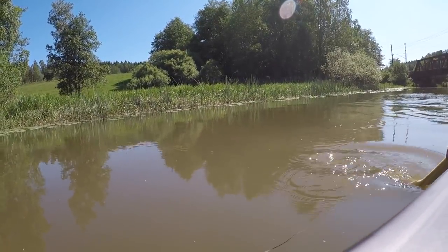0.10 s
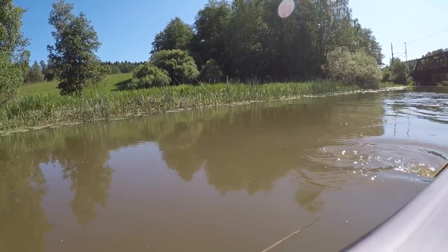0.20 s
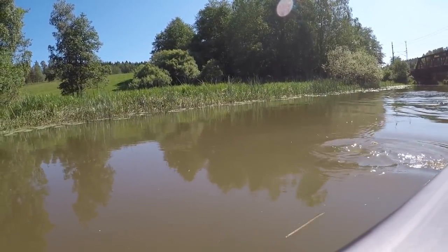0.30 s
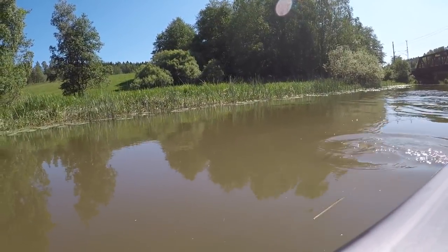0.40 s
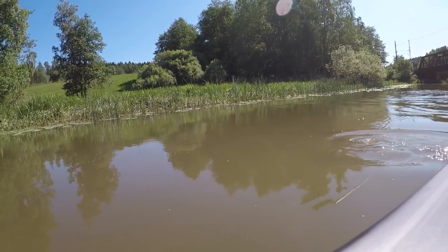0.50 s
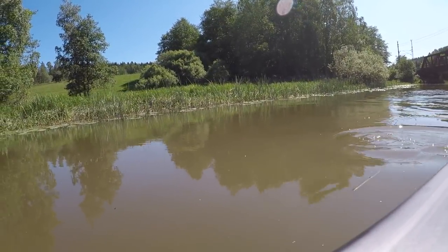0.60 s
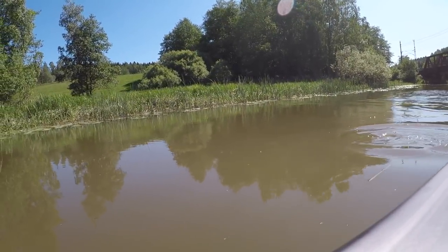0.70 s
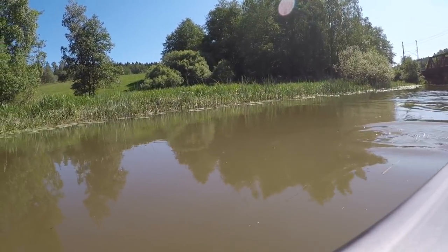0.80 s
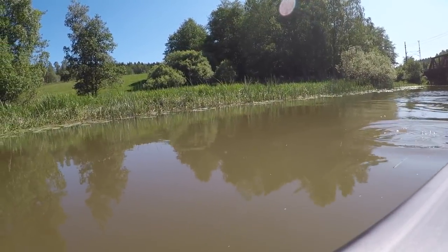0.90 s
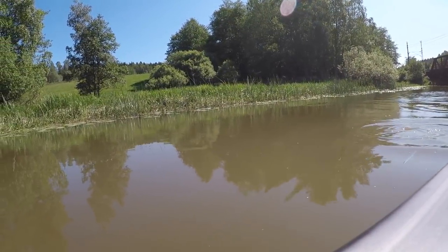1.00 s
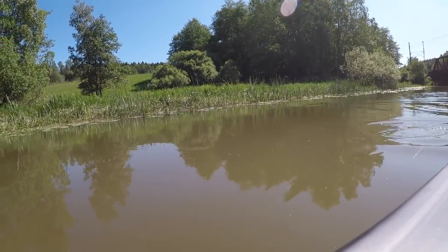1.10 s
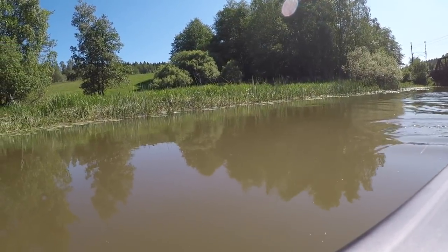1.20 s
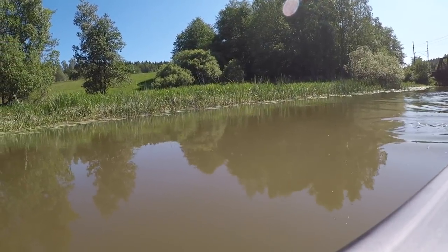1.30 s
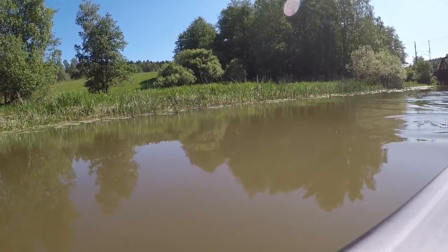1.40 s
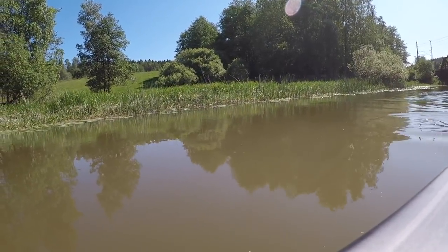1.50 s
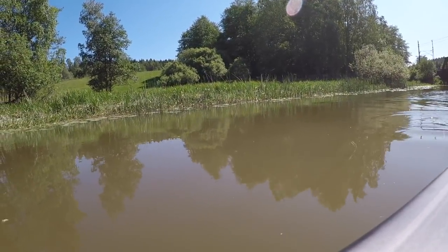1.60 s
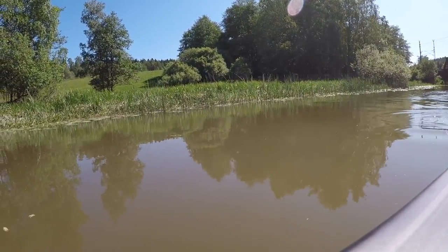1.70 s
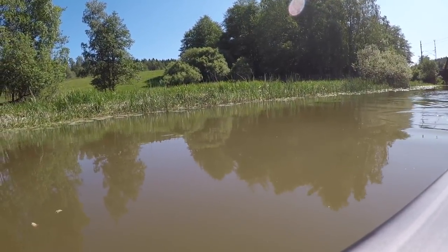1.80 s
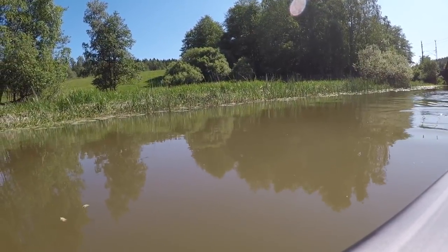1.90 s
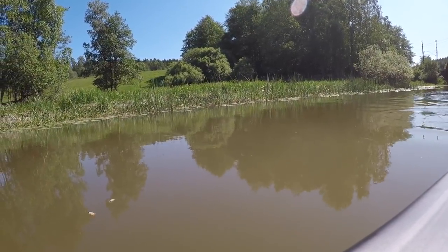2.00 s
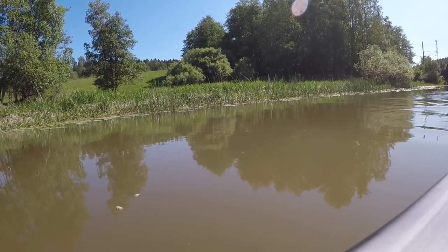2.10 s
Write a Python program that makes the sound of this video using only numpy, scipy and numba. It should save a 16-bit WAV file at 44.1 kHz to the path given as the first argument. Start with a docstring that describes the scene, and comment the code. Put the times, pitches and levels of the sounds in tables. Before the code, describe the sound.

Soft leaf and water hiss with faint hoarse chirps opens. At about 0.25 seconds a paddle shaft knocks very loudly on the canoe's edge, hollow and boomy with a dry crack, bouncing until 0.32. A low woody creak sags until 0.63, with rumbling rubbing and small knocks fading after 1.0. Birds whistle faintly, mostly 1.0-1.8, over faint distant hums; duller taps come near 1.64 and 1.8.

```python
"""A soft hiss of leaves and water comes first, with hoarse chirps on top; then a paddle shaft knocks hard
on a canoe's gunwale, bounces, creaks and rubs along it, and taps twice more while birds whistle.
Filtered noise makes the hiss, low rumble and wood cracks; sines make the birds, two distant hums and the creak.
Impulses and tiny clicks ring the hull modes, which two microphones on the boat feel differently.
The loud knock makes a gain control duck, hold and recover."""
import sys
import numpy as np
from scipy import signal
from scipy.fft import rfft, irfft
from scipy.io import wavfile
from scipy.ndimage import uniform_filter1d, minimum_filter1d
from numba import njit

SR = 44100
rng = np.random.default_rng(int(sys.argv[2]) if len(sys.argv) > 2 else 0)


def wav_record(signal):
    """Record a signal, one row per channel, as 16-bit PCM in the file named by sys.argv[1]."""
    frames = np.transpose(np.atleast_2d(signal))
    bounded = np.clip(frames, -1, 1)
    # unit amplitude maps onto the largest positive 16-bit level
    quanta = np.round(bounded * 32767).astype(np.int16)
    wavfile.write(sys.argv[1], SR, quanta)


N = 92610

# Hiss colour: f/Hz, relative level/dB
AIR_SPECTRUM = [(180, -65), (300, -43), (336, 3), (646, 7.5), (799, 3), (1070, 4), (1440, -3.5),
                (2160, -8.5), (7490, -13), (10000, -16), (14900, -30.5)]
# Stereo likeness of the hiss: f/Hz, left-right correlation (-1 to 1)
AIR_CORRELATION = [(500, -0.81), (1200, -0.63), (2500, 0.085), (4300, -0.072), (8000, 0.1)]
AIR_DB, AIR_FLICKER_DB = -58, 0.86

# Bird notes, one of them long, and two faint steady distant hums: t/s, length/s, start f/Hz, end f/Hz,
# level/dB, bend (exponent of the glide), left minus right/dB, hoarseness (0-1)
BIRDS_AND_HUMS = [(0, .075, 7100, 6800, -68, 1, -2, .8), (.072, .05, 5700, 5100, -63, .4, -2, .8),
                  (.45, .58, 4440, 4370, -68, .5, -4, .3), (.69, .05, 6200, 6200, -68, 1, 0, .2),
                  (.985, .05, 6150, 6100, -62, 1, -2, .2), (1.045, .09, 5900, 5300, -62, .4, -2, .1),
                  (1.18, .015, 2900, 3300, -66, 1, -2, .2), (1.222, .02, 3300, 3600, -65, 1, 0, .4),
                  (1.23, .55, 968, 966, -63.5, 1, 12, .3), (1.3, .5, 2255, 2250, -73, 1, 0, .2),
                  (1.298, .055, 6110, 6104, -54, 1, -2, .05), (1.34, .07, 6108, 6104, -65, 1, -2, .1),
                  (1.408, .025, 5700, 6150, -60, .3, -2, .1), (1.432, .033, 5900, 4700, -58, 1, -2, .25),
                  (1.455, .05, 7700, 7100, -72, 1, 2, .8), (1.465, .03, 5300, 5050, -67, .6, -2, .2),
                  (1.49, .015, 3000, 3400, -59, 1, 0, .1), (1.505, .015, 2800, 2400, -57, 1, 0, .3),
                  (1.568, .02, 4900, 5350, -59, .5, -2, .1), (1.585, .035, 5350, 5100, -61, 2, -2, .2),
                  (1.622, .02, 3600, 2900, -53, .6, 0, .1), (1.685, .03, 7200, 7100, -70, 1, 2, .7),
                  (1.765, .055, 3900, 3150, -63, 1, 0, .6)]
NOTE_FADE_S, ECHO_T60_S, ECHO_DB = .006, .12, -7

# Ringing of hull and mount: f/Hz, relative level/dB, t60/s
HULL_MODES = [(30, -3, .12), (50, -5, .07), (92, 0, .12), (150, 0, .13), (224, 0, .075), (262, 0, .13),
              (322, -12, .08), (400, -5, .08), (455, -1, .08), (535, -3, .055), (590, 1, .035),
              (700, 0, .05), (775, 0, .05), (860, -6, .04), (965, -3, .035), (1070, 0, .03),
              (1170, -5, .03), (1290, -6, .025), (1400, -9, .025), (1520, -2, .03), (1740, -7, .025)]
# Edges of the mode groups: f/Hz (rumble, thud, low and high boom, low and high clack, tick)
MODE_GROUP_EDGES = (0, 120, 190, 240, 360, 640, 880, 9000)
# Delay of each group after a knock: t/s (the slow bending waves come late)
GROUP_ARRIVALS = (.012, .008, .006, .004, 0, 0, .001)
# Time each group takes to swell: t/s
GROUP_SWELLS = (.012, .01, .011, .008, .004, .003, .0025)
# Knocks of the shaft: t/s, then level/dB of rumble, thud, low boom, high boom, low clack, high clack, tick
SHAFT_KNOCKS = [(0.231, -18, -42.5, -24, -63, -40, -23, -49), (0.24, -38, -13, -9, -58, -19.5, -17.5, -42),
                (.2485, -22, -8, 7, -3, 2.5, -6, -25), (0.281, -27, -14.5, 1, -33, -14, -17.5, -36),
                (0.295, -28, -31.5, -32, -22, -21, -26, -42.5),
                (0.3209, -16, -18, 5.5, -32.5, -13.5, -20, -34), (.657, -43, -45, -30, -44, -18, -51, -56),
                (0.673, -56, -30.5, -16.5, -17.5, -25, -46, -40.5),
                (0.739, -53, -52, -16, -19.5, -15.5, -24, -60), (0.77, -55, -31, -46, -25.5, -18, -23, -42),
                (.864, -25, -32, -20.5, -30, -24.5, -21.5, -32),
                (0.922, -36, -26.5, -46.5, -21.5, -16.5, -24, -40.5),
                (1.005, -35.5, -65, -26, -48, -54, -44, -40.5),
                (1.276, -41.5, -33.5, -37, -28.5, -29.5, -43.5, -44),
                (1.3, -32.5, -44.5, -32, -37, -32, -50, -82.5),
                (1.431, -36, -38, -33.5, -49, -24, -33, -49), (1.641, -29.5, -33, -25, -14, -8.5, -23, -39),
                (1.695, -37, -35, -23, -46, -28, -28, -44),
                (1.8, -34, -23.5, -25.5, -20.5, -14, -18.5, -36.5),
                (1.926, -46, -48.5, -41.5, -61, -56, -54, -62)]
# Rubbing and lapping on the hull: t/s, then level/dB of the same seven groups
HULL_RUB = [(0.0, -77, -50, -53, -56, -56.5, -72, -65), (0.18, -66, -53.5, -60, -64.5, -67, -89, -107),
            (0.25, -67, -24.5, -38, -64, -49, -69, -46.5), (0.318, -66, -30, -43, -41, -37.5, -59, -62),
            (0.327, -56, -25, -32.5, -38.5, -29, -41, -40.5),
            (0.41, -33.5, -37.5, -22, -49, -42, -60.5, -47),
            (0.46, -30, -37.5, -31.5, -38, -36.5, -51, -51), (0.59, -33, -32.5, -32, -34, -27, -58.5, -57),
            (0.7, -45, -35, -61.5, -33.5, -40, -59, -57.5),
            (0.87, -32.5, -45.5, -77.5, -43.5, -49, -60, -65.5),
            (0.97, -38, -45.5, -36, -39, -50.5, -64, -69), (1.08, -40.5, -46.5, -44.5, -52, -60, -74, -76),
            (1.23, -42, -46.5, -62, -45, -56, -83, -71), (1.39, -50, -54, -50.5, -43.5, -61, -83, -80),
            (1.51, -46, -56, -57, -54, -67, -86, -83), (1.65, -53, -65, -79, -56, -67, -89, -75),
            (1.78, -48.5, -69.5, -47, -51.5, -61.5, -67, -73),
            (1.86, -50.5, -35.5, -47, -50.5, -64, -69, -73),
            (1.99, -59, -77, -61.5, -55.5, -65, -97, -72.5), (2.1, -65, -50, -56, -52.5, -64, -77, -66)]
RUB_CLICKS_PER_S, RUB_TOP_HZ = 1500, 1950
RUB_SCATTER_DB, RUB_PATCHY_DB = 1.8, 1.6
LOOSE_RUMBLE_DB = -7  # relative to the rumble of the rubbing
# How the right microphone feels the hull against the left: f/Hz, level/dB, phase/rad
RIGHT_MICROPHONE = [(40, 0, .2), (90, -4, -.3), (150, -3, -.7), (195, -11, 1.5), (220, -9, 2.6),
                    (260, 1, 2.0), (320, -7, 1.0), (390, -12, 2.9), (520, -5, 3.1), (700, -1, 3.1),
                    (1000, -2, 3.7), (1250, 0, 3.6), (1600, -1, 4.6), (2500, -1, 5.5)]

# Dry cracks of wood: t/s, level/dB
WOOD_CRACKS = [(0.2544, -20.5), (0.864, -50), (0.926, -44.5)]
CRACK_BAND_HZ, CRACK_T60_S = (900, 3170), 0.0079

# Creak of the shaft: t/s, pitch f/Hz, level/dB
SHAFT_CREAK = [(0.323, 544, -7.5), (.36, 536.6, -8), (.42, 552.6, -12.5), (0.478, 534.5, -13.5),
               (0.497, 514, -11.5), (0.537, 513, -16), (0.554, 455.4, -14.5), (.572, 462, -6),
               (.59, 441, -36), (0.626, 474, -22.5)]
# Overtones of the creak: multiple of the pitch, level/dB against the fundamental
CREAK_HARMONICS = [(2, -30), (3, -44)]
CREAK_WAVER, CREAK_FLICKER_DB = .01, 3.5  # waver as a fraction of the pitch

DUCK_ABOVE_DB, FAST_SHARE, SLOW_SHARE = -11.5, 1, 0.73  # shares: dB of ducking per dB over
FAST_ATTACK_S, FAST_RELEASE_S = .01, .036
SLOW_ATTACK_S, SLOW_RELEASE_S, HOLD_S = .035, .11, 0.48
CEILING, TOP_HZ = 1.25, 14400


def amp(db):
    """Turn decibels into a linear factor."""
    return 10 ** (np.asarray(db) / 20)


def unit(x):
    """Scale a sound to an RMS of 1."""
    return x / np.sqrt(np.mean(x ** 2))


def walk(rate):
    """Random levels held 1 / rate s and slewed twice into a smooth drift."""
    k = int(SR / rate)
    held = np.repeat(rng.standard_normal(N // k + 1), k)
    slewed = uniform_filter1d(uniform_filter1d(held, k), k)
    return 1.3 * slewed[:N]  # makes up for swing lost in the slewing


def column(table, index):
    """Draw straight lines through one column of a table over time."""
    table = np.array(table)
    return np.interp(np.arange(N) / SR, table[:, 0], table[:, index])


def air():
    """Smooth hiss of leaves and water: coloured noise whose octaves each flicker a little on their own."""
    hz = np.maximum(np.fft.rfftfreq(N, 1 / SR), 1)

    def over_pitch(table):
        points = np.array(table)
        return np.interp(np.log(hz), np.log(points[:, 0]), points[:, 1])

    alike = np.clip(over_pitch(AIR_CORRELATION), -1, 1)
    noise = rfft(rng.standard_normal((2, N))) * amp(over_pitch(AIR_SPECTRUM))
    mid, side = noise * np.sqrt([1 + alike, 1 - alike])
    stereo = np.array([mid + side, mid - side])
    scale = np.sqrt(np.mean(irfft(mid * (hz > 1000), N) ** 2))  # mid level above 1 kHz
    out = 0
    for octave in range(8, 15):  # centred on 2 ** octave Hz, crossfading into its neighbours
        band = np.clip(1 - np.abs(np.log2(hz) - octave), 0, 1)
        out = out + irfft(stereo * band, N) * amp(AIR_FLICKER_DB * walk(11.0))
    return out / scale * amp(AIR_DB)


def loose_rumble():
    """Low rumble, independent noise in each channel, rising and falling with the rub's rumble."""
    band = signal.butter(2, (25, 170), "bandpass", fs=SR, output="sos")
    noise = signal.sosfilt(band, rng.standard_normal((2, N)))
    return unit(noise) * amp(column(HULL_RUB, index=1) + LOOSE_RUMBLE_DB)


def birds_and_hums():
    """Sines that glide as bird notes or stay nearly steady as hums, hoarse ones roughened by fast
    level swings, all with a faint echo from the bank."""
    out = np.zeros((2, N))
    rough, waver = walk(900), amp(2.5 * walk(25))
    for start, length, hz0, hz1, db, bend, pan_db, hoarse in BIRDS_AND_HUMS:
        i = int(max(start, 0) * SR)
        u = np.linspace(0, 1, int(length * SR))
        span = slice(i, i + len(u))
        pitch = hz0 + (hz1 - hz0) * u ** bend
        fade = np.clip(np.minimum(u, 1 - u) * length / NOTE_FADE_S, 0, 1)
        tone = np.sin(2 * np.pi * np.cumsum(pitch) / SR) * fade
        tone = tone * waver[span] * (1 - hoarse + 1.5 * hoarse * rough[span])
        sides_db = db + np.array([[pan_db], [-pan_db]]) / 2
        out[:, span] += tone * amp(sides_db) * np.sqrt(2)
    t = np.arange(SR // 4) / SR
    echo = rng.standard_normal((2, len(t))) * amp(-60 * t / ECHO_T60_S)
    echo = echo / np.sqrt(np.sum(echo[0] ** 2)) * amp(ECHO_DB)
    return out + signal.fftconvolve(out, echo, axes=1)[:, :N]


def both_microphones(x):
    """The hull shakes the two microphones with different strength and phase at each frequency."""
    hz = np.fft.rfftfreq(N, 1 / SR)
    port_hz, port_db, port_phase = np.array(RIGHT_MICROPHONE).T
    turn = amp(np.interp(hz, port_hz, port_db)) * np.exp(1j * np.interp(hz, port_hz, port_phase))
    return np.array([x, irfft(rfft(x) * turn, N)])


def ring(group):
    """Response of one group of hull modes to a short push, neighbours in opposite sense, peak 1."""
    t = np.arange(SR // 2) / SR
    out = np.zeros(len(t))
    for k, (hz, db, t60) in enumerate(HULL_MODES):
        if MODE_GROUP_EDGES[group] < hz <= MODE_GROUP_EDGES[group + 1]:
            out += (-1) ** k * amp(db - 60 * t / t60) * np.sin(2 * np.pi * hz * t)
    out = out * np.sin(np.pi / 2 * np.clip(t / GROUP_SWELLS[group], 0, 1)) ** 2
    return out / np.abs(out).max()


def hull():
    """Shaft knocks and a dense stick-slip of tiny soft clicks drive the same hull modes."""
    out = 0
    soft = signal.butter(6, RUB_TOP_HZ, fs=SR, output="sos")
    for group in range(len(GROUP_SWELLS)):
        response = ring(group)
        clicks = rng.random(N) < RUB_CLICKS_PER_S / SR
        clicks = clicks * amp(RUB_SCATTER_DB * rng.exponential(size=N)) * rng.choice([-1, 1], N)
        rub_db = column(HULL_RUB, index=group + 1) + RUB_PATCHY_DB * walk(25.52)
        rub = signal.sosfilt(soft, unit(clicks)) * amp(rub_db)
        # Even out the groups by the energy of their ringing, averaged over both microphones.
        heard = both_microphones(np.pad(response, (0, N - len(response)))).mean(axis=0)
        drive = rub / np.sqrt(np.sum(heard ** 2))
        for knock in SHAFT_KNOCKS:
            drive[int((knock[0] + GROUP_ARRIVALS[group]) * SR)] += amp(knock[group + 1])
        out = out + signal.fftconvolve(drive, response)[:N]
    return out


def cracks():
    """Dry wood cracks through the air: short bright noise bursts with a fast decay."""
    t, out = np.arange(N) / SR, 0
    band = signal.butter(3, CRACK_BAND_HZ, "bandpass", fs=SR, output="sos")
    noise = unit(signal.sosfilt(band, rng.standard_normal(N)))
    for start, db in WOOD_CRACKS:
        age = np.maximum(t - start, 0)
        rise = np.minimum(age * 1000, 1)  # 1 ms
        out = out + noise * rise * amp(db - 60 * age / CRACK_T60_S)
    return out


def creak():
    """Stick-slip of the shaft: a tone with two overtones, wavering in pitch and flickering in level."""
    t = np.arange(N) / SR
    pitch = column(SHAFT_CREAK, index=1) * (1 + CREAK_WAVER * walk(65.0))
    phase = 2 * np.pi * np.cumsum(pitch) / SR
    tone = np.sin(phase)
    for multiple, db in CREAK_HARMONICS:
        tone = tone + amp(db + 4 * walk(30)) * np.sin(multiple * phase)
    inside = np.minimum(t - SHAFT_CREAK[0][0], SHAFT_CREAK[-1][0] - t)
    gate = np.clip(inside / 0.0055, 0, 1)  # 5.5 ms fades
    return tone * gate * amp(column(SHAFT_CREAK, index=2) + CREAK_FLICKER_DB * walk(68.75))


def scene():
    """Hull and creak reach the microphones through the boat; the other layers are added beside them."""
    through_boat = both_microphones(hull() + creak())
    return air() + loose_rumble() + birds_and_hums() + through_boat + cracks()


@njit
def follow(x, attack, release):
    """Level follower that closes a set share of the gap per sample, one share rising, one falling."""
    y, e = np.empty(len(x)), 0.
    for i in range(len(x)):
        e += (x[i] - e) * (attack if x[i] > e else release)
        y[i] = e
    return y


def record(dry):
    """Gain control that ducks fast, holds a while and comes back, then soft clipping and a treble cut."""
    level_db = 20 * np.log10(np.abs(dry).max(axis=0) + 1e-9)
    over_db = np.maximum(level_db - DUCK_ABOVE_DB, 0)
    fast = follow(over_db, 1 / (FAST_ATTACK_S * SR), 1 / (FAST_RELEASE_S * SR))
    slow = follow(over_db, 1 / (SLOW_ATTACK_S * SR), 1 / (SLOW_RELEASE_S * SR))
    hold = int(HOLD_S * SR)
    # The negated minimum is the highest value of the past hold time.
    peak = -minimum_filter1d(-slow, hold, origin=(hold - 1) // 2, mode="nearest")
    slow = follow(peak, 1., 1 / (SLOW_RELEASE_S * SR))
    ducked = dry * amp(-FAST_SHARE * fast - SLOW_SHARE * slow)
    clipped = CEILING * np.tanh(ducked / CEILING)
    return signal.sosfilt(signal.ellip(8, .2, 70, TOP_HZ, fs=SR, output="sos"), clipped)


dry = scene()
out = record(dry)
wav_record(out)
```